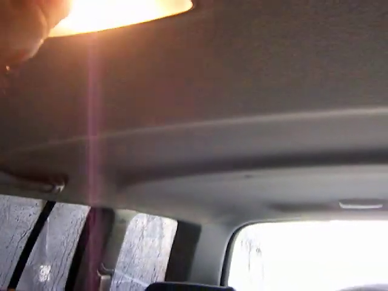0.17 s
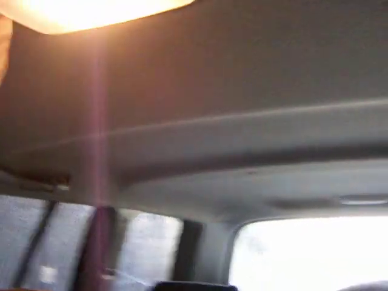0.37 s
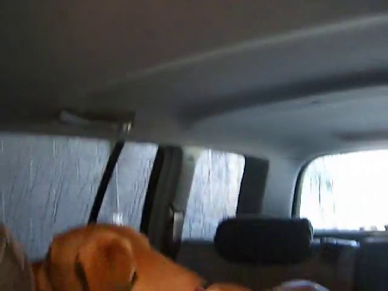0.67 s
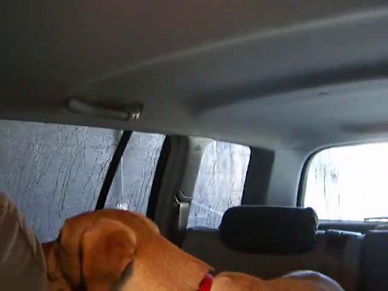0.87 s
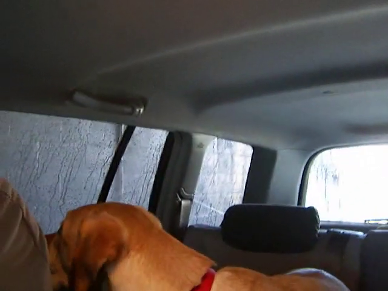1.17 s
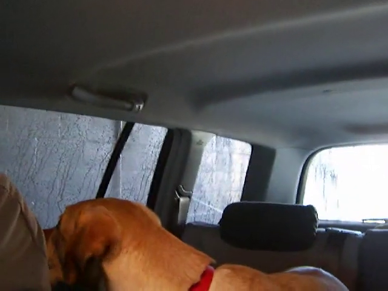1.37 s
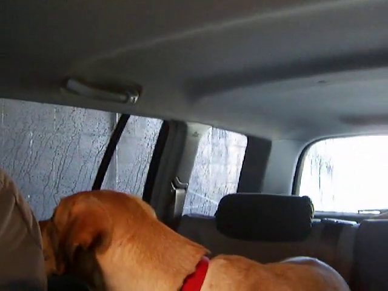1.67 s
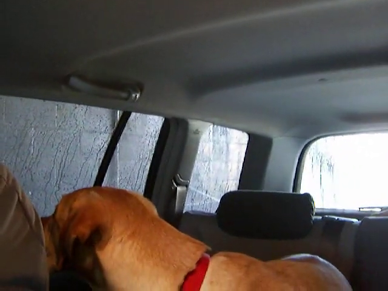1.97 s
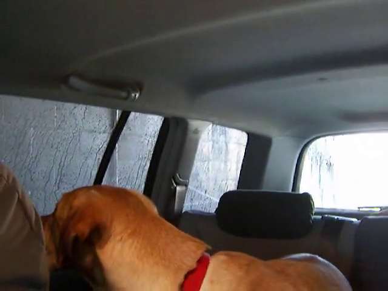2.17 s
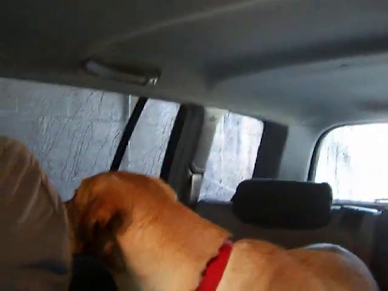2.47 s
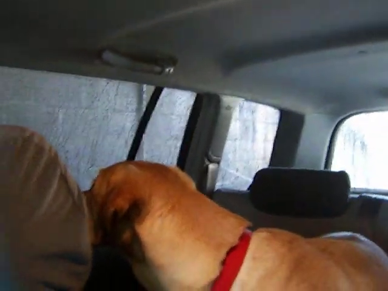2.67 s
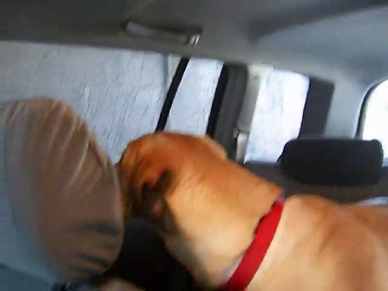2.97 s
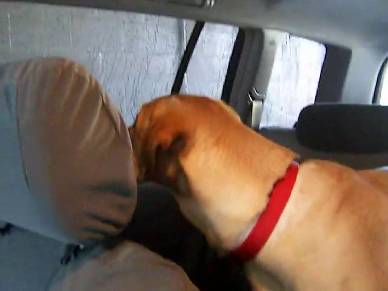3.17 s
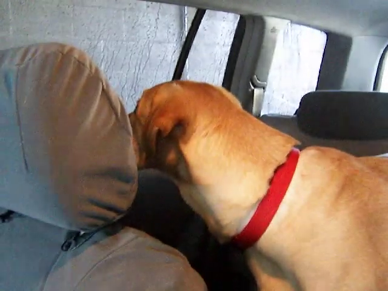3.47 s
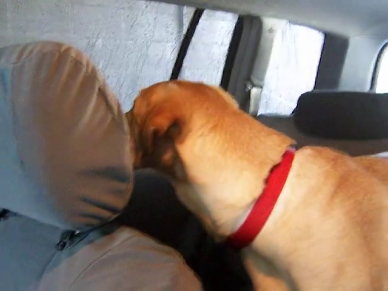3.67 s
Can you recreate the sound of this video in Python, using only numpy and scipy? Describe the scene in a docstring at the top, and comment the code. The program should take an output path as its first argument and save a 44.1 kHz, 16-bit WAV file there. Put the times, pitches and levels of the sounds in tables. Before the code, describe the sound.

A car wash rumbles steadily, heard inside the idling car, with a pump hum, soft hiss and a faint, thin electrical whine. At about 0.1 seconds a roof light switch snaps sharply, close by. Light spray patters on the glass, easing around 2 seconds, when there is one tiny tick and a brush motor starts droning, sagging slightly in pitch. The spray returns briefly near 3.7 seconds.

```python
"""Inside a car in a car wash. From the start the idling engine and the shaking body rumble, a pump hums
and spray hisses on the glass; a thin electrical whine runs throughout. Right away a finger presses
the roof light switch, which snaps close by and rings its plastic housing. Near 1 s the wash sings
faintly. Around 2 s the spray eases off, there is one tiny tick, and the brush motor starts to drone,
its pitch sagging under load. The spray comes back briefly at the end."""
import sys
import numpy as np
from scipy import signal
from scipy.fft import rfft, irfft
from scipy.io import wavfile

SR = 44100
rng = np.random.default_rng(int(sys.argv[2]) if len(sys.argv) > 2 else 0)


def materialize(psi):
    """Save the field psi as 16-bit PCM at rate SR to the path in sys.argv[1].

    A 1-D psi becomes a single channel; in a 2-D psi each row is a channel.
    """
    bounded = np.clip(np.atleast_2d(psi).T, -1, 1)
    quanta = np.round(bounded * 32767).astype(np.int16)
    wavfile.write(sys.argv[1], SR, quanta)


N = 168903
TIME = np.arange(N) / SR

# Blows on the switch: start_s, knock_db, knock_pitch_hz, crack_db, housing_db, lining_db
SWITCH_BLOWS = [(.0040, -23.5, 1500, -36, -34.5, -63), (0.0883, -23.5, 900, -40.5, -46, -23.5),
                (0.1241, -9, 2920, -18, -31.5, -24.5), (0.1252, -10.5, 1270, -30, -27, -35)]
# Tone of the bright crack: pitch_hz, level_db
CRACK_TONE = [(200, -6), (900, 1), (1700, -3.5), (2450, 9.5), (3200, 4.5), (4400, -9.5), (5500, -7),
              (6400, -0.5), (7500, -10.5), (8200, -38), (9000, -34)]
# Notes the plastic lamp housing and the roof lining ring at: pitch_hz, level_db, fade_s
HOUSING_NOTES = [(628, -0.5, 0.061), (860, -5, 0.022), (1005, 0, 0.046), (1080, -12.5, 0.06),
                 (1344, -1, .055), (1575, -6, 0.063), (1796, -3, 0.053), (1880, -15, 0.13), (2175, -3, .04),
                 (2590, -24, .035), (2890, -12, 0.03), (3076, -5.5, 0.026), (3560, -7, 0.03),
                 (4940, -2.5, 0.023), (5440, -8, 0.032), (6280, -17, .02), (7190, -8, .018)]
LINING_NOTES = [(117.8, -1.5, 0.18), (178, -12, 0.049), (280, -1.5, 0.06), (445, -4, 0.068)]
def switch(knock_cycles=0.7, crack_s=0.00099, tail_db=-10, tail_s=0.0059):
    """Touch, press and double snap: each knocks, cracks, rings the housing and pushes the lining."""
    out, t = np.zeros(N), TIME[:SR // 4]
    burst = np.exp(-(t / crack_s) ** 2 / 2) + gain(tail_db) * np.exp(-t / tail_s)
    for start_s, knock_db, knock_hz, crack_db, housing_db, lining_db in SWITCH_BLOWS:
        cycles = (TIME - start_s) * knock_hz
        out -= gain(knock_db) * np.exp(-(cycles / knock_cycles) ** 2) * np.sin(2 * np.pi * cycles)
        crack = gain(crack_db) * unit(noise(CRACK_TONE, len(t))) * burst
        housing = gain(housing_db) * ring(HOUSING_NOTES, t)
        lining = gain(lining_db) * ring(LINING_NOTES, t)
        add(out, start_s, crack + housing + lining)
    return out


# How loud the slider scrapes: time_s, level_db
SCRAPE_LEVELS = [(.07, -94), (.079, -36.5), (.098, -45.5), (.108, -39.5), (.119, -33.5), (.123, -27.5),
                 (.127, -92.5)]
# Tone of the scrape: pitch_hz, level_db
SCRAPE_TONE = [(100, -5), (500, 7.5), (1400, -1), (1950, 0.5), (2600, -13), (4500, -20), (6300, -12),
               (7600, -19.5), (9000, -40.5)]
def scrape():
    """The switch's slider scrapes under the finger before it snaps over."""
    return loudness(SCRAPE_LEVELS) * unit(noise(SCRAPE_TONE))


# Tone of the body's rumble and of the wash's hiss: pitch_hz, level_db
RUMBLE_TONE = [(5, -1), (12, -2), (27, -10), (38, 6), (47, -6.5), (58, -0.5), (72, -10.5), (115, -9),
               (165, -17.5), (230, -17.5), (400, -22), (520, -28.5), (700, -34), (1100, -74)]
HISS_TONE = [(300, -7), (700, 4.5), (1200, -1.5), (1800, -5), (2400, -5), (4200, -9.5), (7000, -10),
             (7500, -11.5), (8100, -20), (8600, -29.5), (9000, -40)]
# How loud the faint singing note is: time_s, level_db
SING_LEVELS = [(0, -82), (.95, -80), (1.13, -62.5), (1.3, -77), (2.2, -71.5), (2.8, -63.5), (3.3, -66),
               (3.83, -65)]
def wash(rumble_db=-35.5, hiss_db=-55, rumble_swell_db=0.96, hiss_swell_db=0.53, sing_hz=1155):
    """Water and brushes shake the body and hiss through the shell, with a faint singing note."""
    rumble = unit(noise(RUMBLE_TONE) * gain(rumble_swell_db * drift(hz=2.6)))
    hiss = unit(noise(HISS_TONE) * gain(hiss_swell_db * drift(hz=8.8)))
    waver = muffle(rng.standard_normal(N), above_hz=39)
    sing = unit(waver * np.sin(2 * np.pi * sing_hz * TIME))
    return gain(rumble_db) * rumble + gain(hiss_db) * hiss + loudness(SING_LEVELS) * sing


# The engine's tones: multiple_of_firing_rate, level_db
ENGINE_TONES = [(1, -42.5), (2, -39), (3, -53.5)]
def engine(firing_hz=21.22):
    """The idling engine fires slightly unevenly, making a low throb."""
    return hum(firing_hz, ENGINE_TONES, wander=0.017, flutter_db=2.5, flutter_hz=11)


# The pump's tones: multiple_of_speed, level_db
PUMP_TONES = [(2, -48.5), (3, -55.5), (4, -59.5), (5, -63)]
# How much they are all turned up or down: time_s, change_db
PUMP_SWELL = [(0, 5), (.6, -7), (2.3, -3.5), (2.9, 1), (3.83, 1)]
def pump(speed_hz=84.74):
    """The turning pump hums; its level dips early, then builds again."""
    return hum(speed_hz, PUMP_TONES, wander=0.0032, flutter_db=2.0, flutter_hz=5) * loudness(PUMP_SWELL)


# The brush motor's drone: time_s, pitch_hz, level_db
BRUSH_DRONE = [(0, 376, -82), (2.0, 377.6, -66.5), (2.2, 373.6, -55), (2.599, 371.3, -49.5),
               (2.95, 367.8, -46.5), (3.2, 367.5, -57.5), (3.6, 367.5, -47.5), (3.83, 365.6, -55.5)]
def brush_motor():
    """The motor swells into one droning note that sags under load."""
    time_s, pitch_hz, level_db = np.transpose(BRUSH_DRONE)
    sagging_hz = np.interp(TIME, time_s, pitch_hz)
    drone = hum(sagging_hz, [(1, 0.016)], wander=0.0033, flutter_db=2.5, flutter_hz=5.5)
    return drone * gain(np.interp(TIME, time_s, level_db))


# Tone of the spray on the glass: pitch_hz, level_db
SPRAY_TONE = [(600, -9), (1300, -5), (2100, -1), (3200, 0.5), (4200, -4.5), (6000, -12.5), (7500, -20),
              (9000, -55.5)]
# How loud the spray is: time_s, level_db
SPRAY_LEVELS = [(0, -59), (.8, -61.5), (1.55, -59.5), (2.0, -64.5), (2.55, -72), (3.5, -76), (3.7, -63),
                (3.83, -70)]
def spray(drops_per_s=2500, drop_share=0.33):
    """Many tiny drops patter on the windows, blended with the smooth hiss of mist."""
    hits = rng.random(N) < drops_per_s / SR
    strength_db = np.minimum(rng.exponential(1, N), 4)
    drops = unit(hits * gain(strength_db) * rng.choice([-1, 1], N))
    mist = rng.standard_normal(N)
    water = np.sqrt(drop_share) * drops + np.sqrt(1 - drop_share) * mist
    return loudness(SPRAY_LEVELS) * unit(shape_tone(water, SPRAY_TONE))


def tick(time_s=2.1738, level_db=-35, pitch_hz=5700, width_s=0.00016):
    """One very short, bright tick."""
    t = TIME - time_s
    return gain(level_db) * np.exp(-(t / width_s) ** 2) * np.cos(2 * np.pi * pitch_hz * t)


def whine(pitch_hz=6903, level_db=-63):
    """A thin, steady electrical whine."""
    return gain(level_db) * unit(np.sin(2 * np.pi * pitch_hz * TIME))


def cabin(sound, echo_db=-13, echoes_per_s=3000, delay_s=0.0017, fade_s=0.061):
    """Adds short, soft echoes off the glass and upholstery."""
    t = TIME[:SR // 4]
    bounces = rng.choice([-1, 1], len(t)) * (rng.random(len(t)) < echoes_per_s / SR)
    bounces = bounces * (t > delay_s) * gain(-60 * t / fade_s)
    echoes = signal.fftconvolve(sound, bounces / np.linalg.norm(bounces))[:N]
    return sound + gain(echo_db) * muffle(echoes, above_hz=4500)


def gain(db):
    """Turns decibels into a number to multiply by."""
    return 10 ** (np.asarray(db) / 20)


def unit(x):
    """Scales a signal to an average strength (rms) of 1."""
    return x / np.sqrt(np.mean(x ** 2) + 1e-20)


def loudness(levels):
    """A gain that glides through (time_s, level_db) points."""
    return gain(np.interp(TIME, *np.transpose(levels)))


def shape_tone(x, tone):
    """Turns lows and highs up or down along (pitch_hz, level_db) points."""
    hz, db = np.transpose(tone)
    pitches = np.fft.rfftfreq(len(x), 1 / SR)
    return irfft(rfft(x) * gain(np.interp(np.log(pitches + 1), np.log(hz), db)), len(x))


def noise(tone, samples=N):
    """Random noise with the given tone."""
    return shape_tone(rng.standard_normal(samples), tone)


def drift(hz):
    """A slow random wobble, up to about this rate."""
    rates = np.fft.rfftfreq(N, 1 / SR)
    return unit(irfft(rfft(rng.standard_normal(N)) * (rates > 0) / (1 + (rates / hz) ** 4), N))


def muffle(x, above_hz):
    """Gently turns down the highs."""
    return signal.lfilter(*signal.butter(2, above_hz, fs=SR), x)


def ring(notes, t):
    """Pure notes that each drop 60 dB in fade_s; neighbours swing opposite ways."""
    return sum((-1) ** k * gain(db - 60 * t / fade_s) * np.sin(2 * np.pi * hz * t)
               for k, (hz, db, fade_s) in enumerate(notes))


def hum(hz, tones, wander, flutter_db, flutter_hz):
    """Tones at multiples of a wandering speed, each fluttering in level."""
    turns = np.cumsum(hz * (1 + wander * drift(hz=3.37))) / SR
    out = np.zeros(N)
    for multiple, level_db in tones:
        wave = np.sin(2 * np.pi * (multiple * turns + rng.random()))
        out += gain(level_db) * unit(wave * gain(flutter_db * drift(flutter_hz)))
    return out


def add(mix, start_s, sound):
    """Mixes a sound in at its start time."""
    part = mix[round(start_s * SR):][:len(sound)]
    part += sound[:len(part)]


def scene():
    """Everything heard inside the car, in one channel."""
    machines = engine() + pump() + brush_motor() + whine()
    return (machines + wash() + spray() + cabin(switch() + scrape()) + tick())[None]


def record(dry):
    """Cuts off the highs above 9000 Hz."""
    treble_cut = signal.firwin(511, 9000, window=("kaiser", 9), fs=SR)
    return signal.oaconvolve(dry, treble_cut[None], "same")


dry = scene()
out = record(dry)
materialize(out)
```